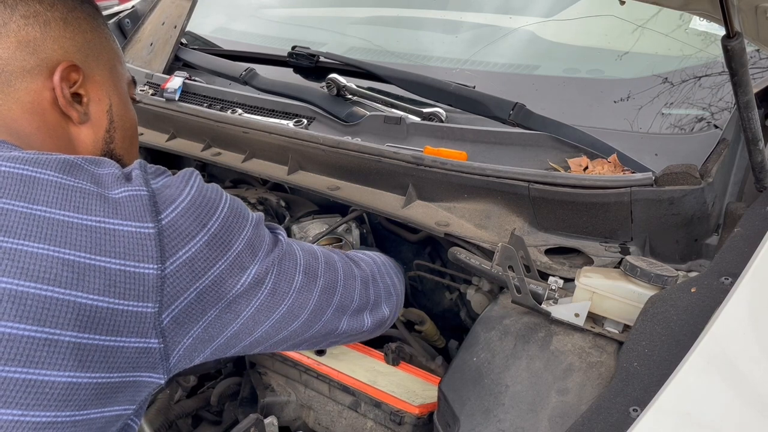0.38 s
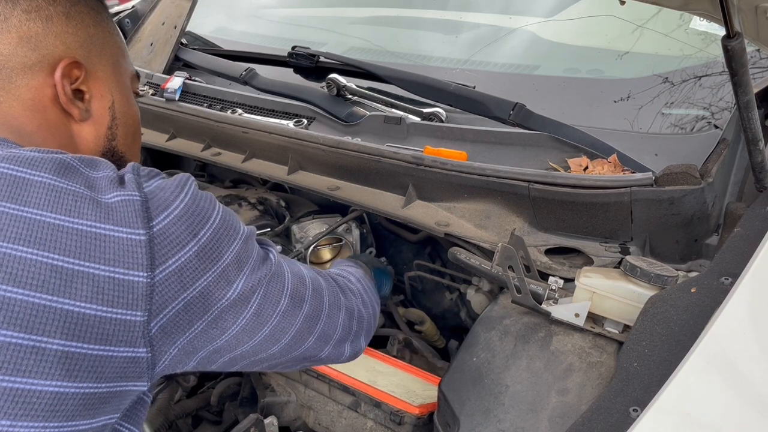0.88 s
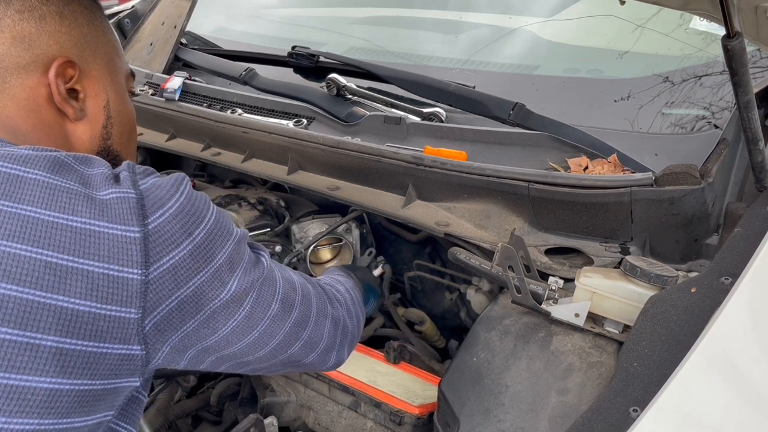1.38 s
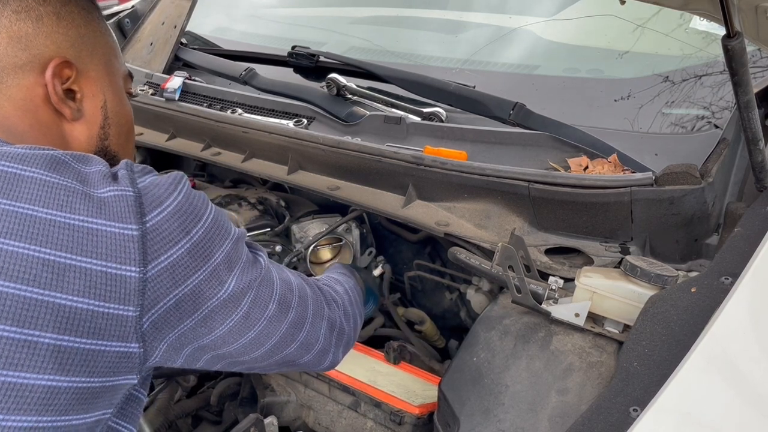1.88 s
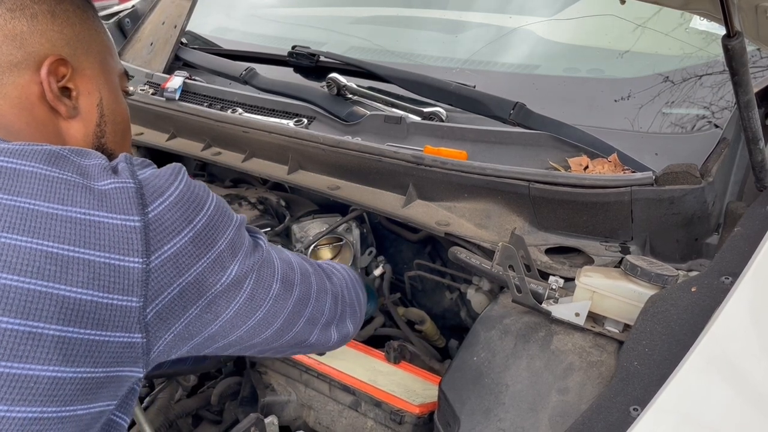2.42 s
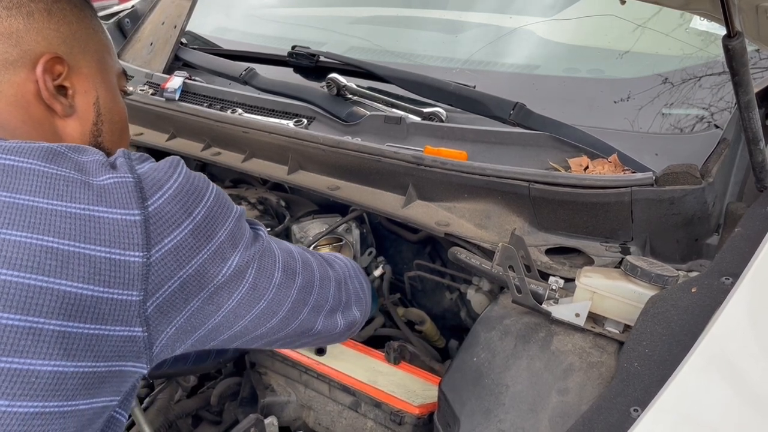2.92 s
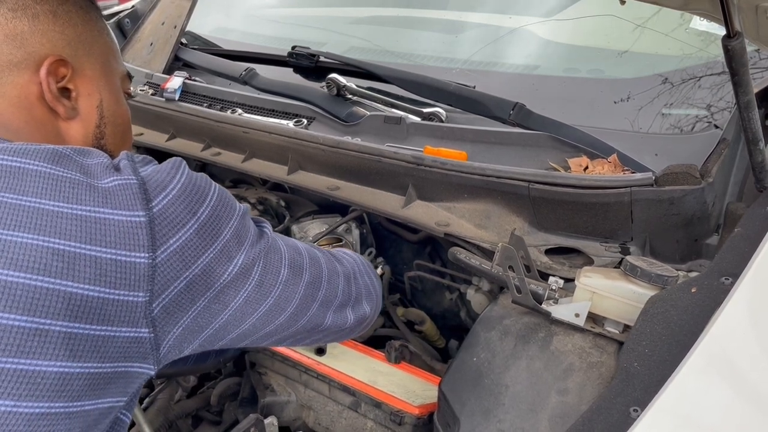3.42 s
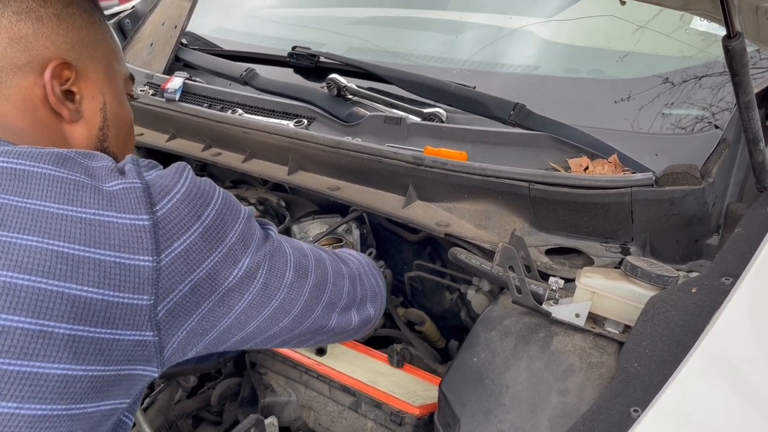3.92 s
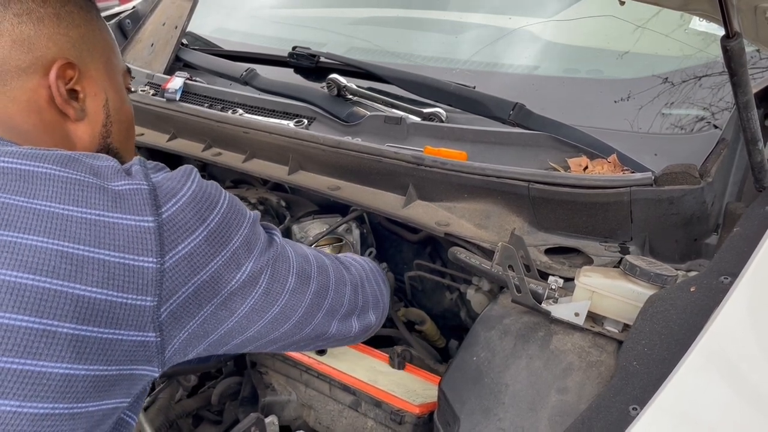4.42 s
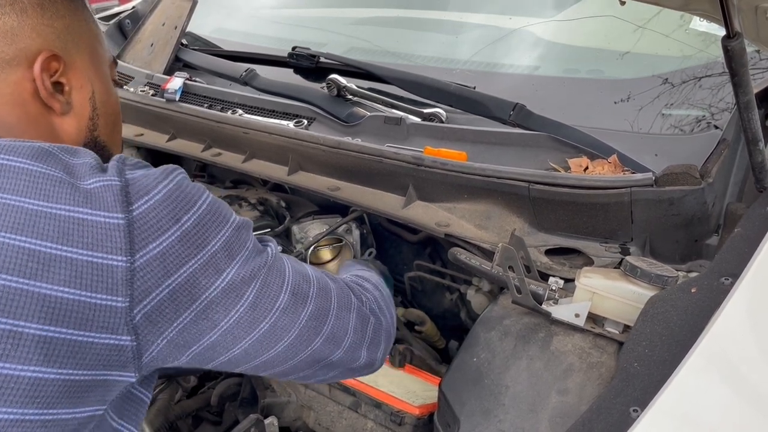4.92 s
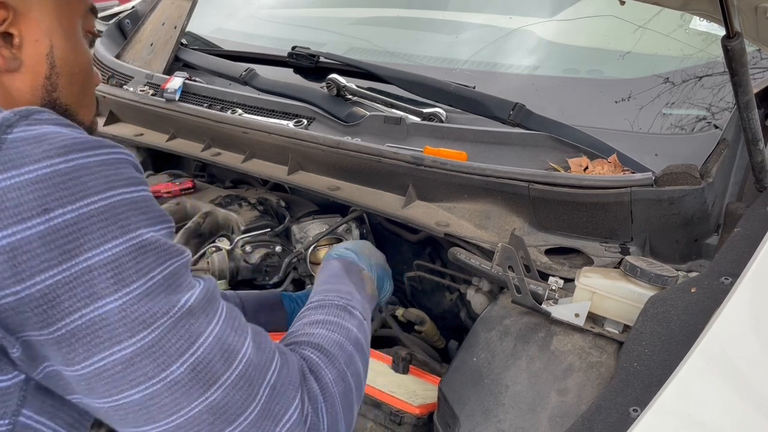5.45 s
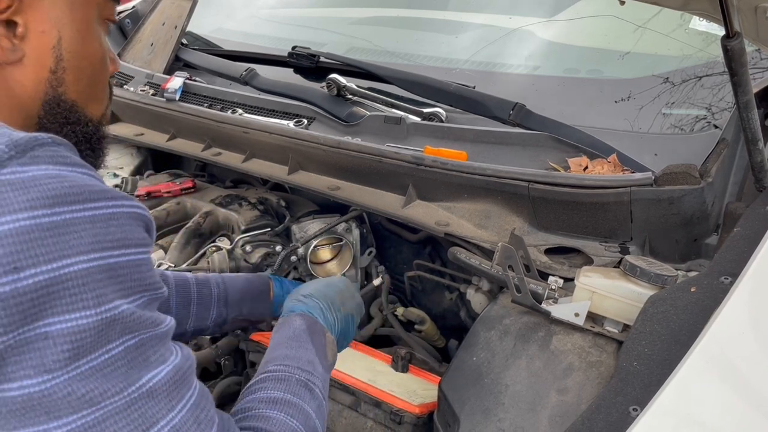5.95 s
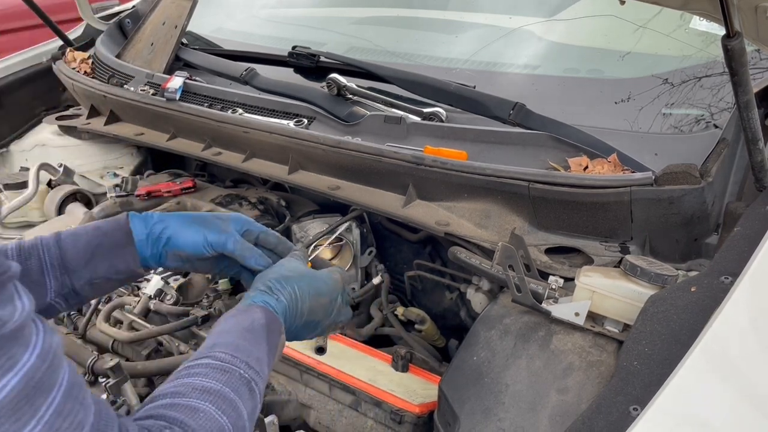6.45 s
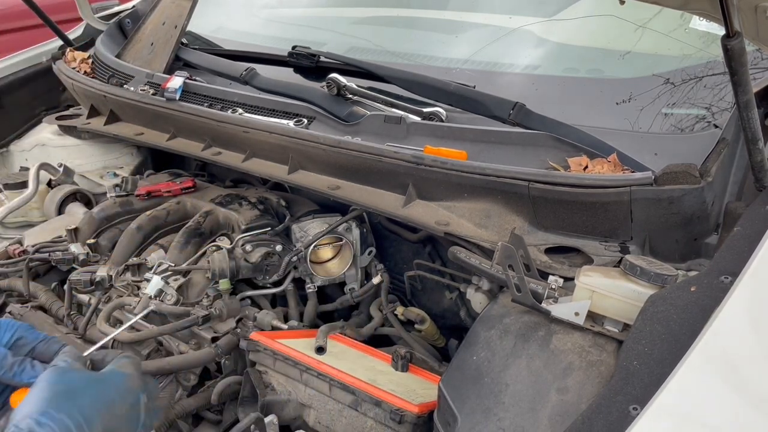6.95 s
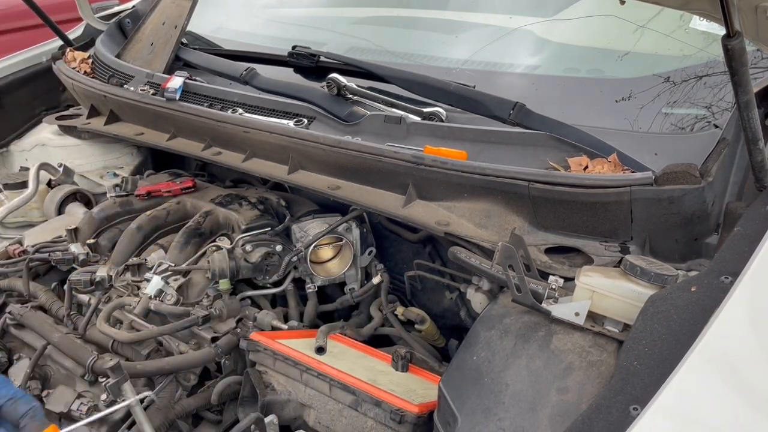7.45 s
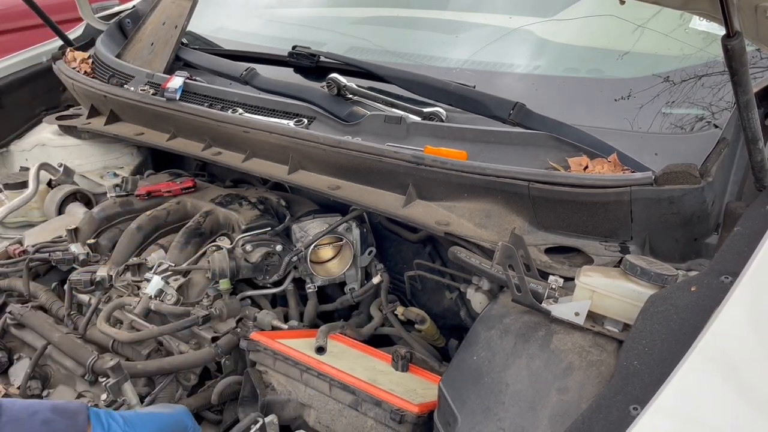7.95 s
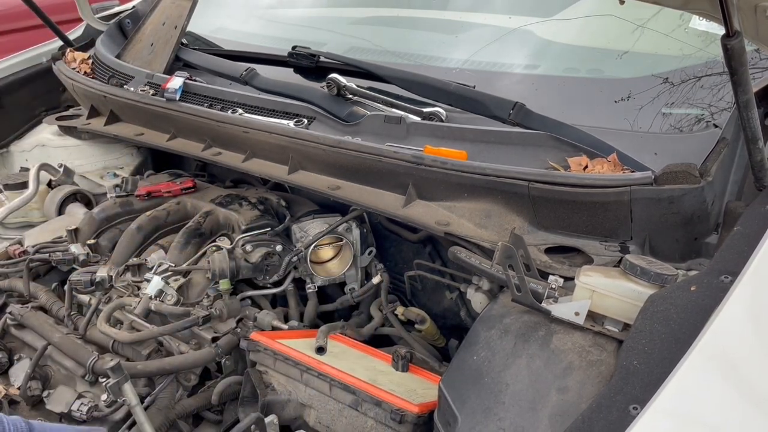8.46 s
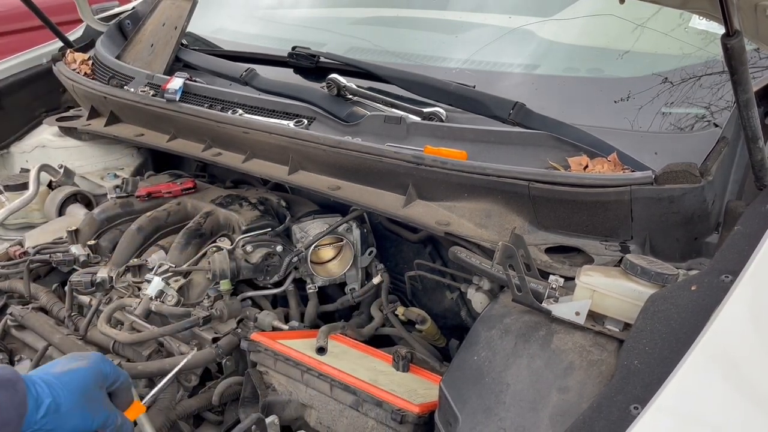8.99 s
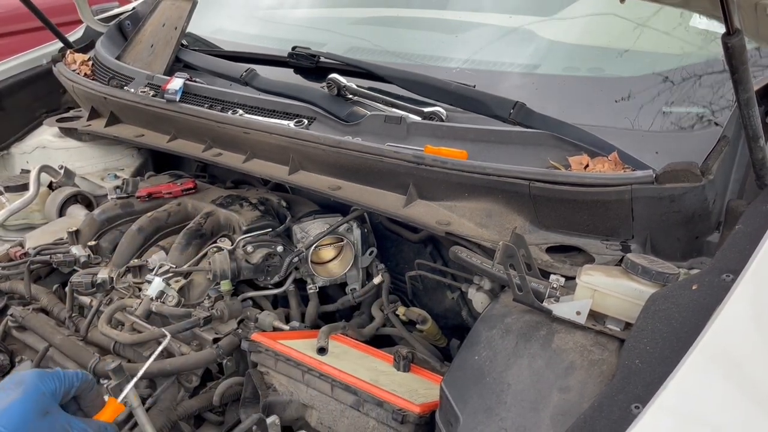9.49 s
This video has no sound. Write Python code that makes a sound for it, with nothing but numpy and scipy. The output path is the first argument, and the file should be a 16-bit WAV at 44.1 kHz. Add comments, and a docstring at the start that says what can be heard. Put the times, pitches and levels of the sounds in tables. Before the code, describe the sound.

Outdoors, breezy rumble over distant traffic; rapid steel clanking comes in spells, with sharp clicks, tool taps and cloth rustle close by.

```python
"""Gloved hands work at hoses and plastic connectors in an open engine bay, outdoors, close to a phone.
From the start: breeze and gusts as lumpy noise at two ports, far traffic roar and sleeve rustle as coloured noise,
and off to the right, in spells, a steel tool hammering about nine times a second: noise clanks and ringing tones.
Then bright metal ticks and single strong eddies; from 2.9 s clips snap and a tool taps, as cracks that ring the parts;
a tool tip drags over hose ribs at 6.2 s, and at 7.4 s two rough rising tones squeak faintly."""
import sys
import numpy as np
from scipy import signal
from scipy.fft import rfft, irfft, next_fast_len
from scipy.io import wavfile
from scipy.ndimage import uniform_filter1d, map_coordinates

SR = 44100
rng = np.random.default_rng(int(sys.argv[2]) if len(sys.argv) > 2 else 0)


def attenuation_scalar(level_db):
    """Turn a level in dB into a linear amplitude multiplier (20 dB per decade)."""
    decades = np.asarray(level_db, float) / 20
    return 10 ** decades


def digitize_waveform(pressure):
    """Quantize a signal to 16-bit integers and store it at the path in sys.argv[1].

    Rows of a 2-D input are taken as channels; values are limited to [-1, 1].
    """
    field = np.atleast_2d(pressure).T
    bounded = np.clip(field, -1, 1)
    quanta = np.round(bounded * 32767).astype(np.int16)
    wavfile.write(sys.argv[1], SR, quanta)


N = 423801

# Phase between the ports, near sound. Each row: frequency in Hz, lead of the left in radians.
NEAR_LEAD_RAD = [(0, 0), (3000, 1), (5500, 0.2), (6300, 3.33), (8000, 2.15), (8800, 1.54), (10000, 0.3),
                 (12000, -.4), (13500, -2.8), (16500, -3.1)]
# The same for far sound. Each row: frequency in Hz, lead of the left in radians.
FAR_LEAD_RAD = [(0, .01), (2240, 6.1), (5500, 6.2), (6500, 3.6), (8000, 3.1), (8800, 2.3), (9900, .15),
                (12200, -.1), (13300, -2.9), (16500, -3.1)]
# Likeness of far sound at the ports. Each row: frequency in Hz, correlation (0-1).
FAR_LIKENESS = [(200, 0.91), (500, 0.83), (1000, 0.52), (2500, 0.68), (4000, 0.029), (5000, 0.61),
                (6000, 0.11), (7300, 0.99), (8300, 0.9), (9200, 0.34), (10000, 0.74), (12000, 0.86),
                (13000, .5), (14000, 0.8)]


def unit(x):
    """Scaled to rms 1."""
    return x / np.sqrt(np.mean(x ** 2) + 1e-20)


def along(points, hz):
    """(Hz, value) points interpolated on a log frequency axis."""
    f, v = np.transpose(points)
    return np.interp(np.log(hz + 1), np.log(f + 1), v)


def curves(rows):
    """One value per sample for each column after the time."""
    s, *cols = np.transpose(rows)
    return [np.interp(np.arange(N) / SR, s, c) for c in cols]


def wobble(rate_hz):
    """A smooth random curve, rate_hz knots a second."""
    knots = rng.standard_normal(int(N * rate_hz / SR) + 4)
    return map_coordinates(knots, [np.arange(N) * rate_hz / SR])


def filtered(x, response):
    """x shaped by a complex response of frequency."""
    n = x.shape[-1]
    m = next_fast_len(n + 4096)
    return irfft(rfft(x, m) * response(np.fft.rfftfreq(m, 1 / SR)), m)[..., :n]


def ports(pair, lead):
    """Half of the phase lead goes to each port, with opposite signs."""
    hz, rad = np.transpose(lead)
    sign = np.array([[1], [-1]])
    return filtered(pair, lambda f: np.exp(.5j * np.interp(f, hz, rad) * sign))


def blended(pair, spectrum, likeness):
    """Two unrelated signals coloured and mixed to a left-right likeness, rms 1."""
    def mid_side_gain(hz):
        angle = np.arccos(np.clip(along(likeness, hz), -1, 1)) / 2
        return attenuation_scalar(along(spectrum, hz)) * [np.cos(angle), np.sin(angle)]

    mid, side = filtered(pair, mid_side_gain)
    return unit(np.array([mid + side, mid - side]))


def noise():
    """White noise for both ports."""
    return rng.standard_normal((2, N))


def coloured(spectrum, count):
    """Mono noise of a given colour, rms 1."""
    return unit(filtered(rng.standard_normal(count), lambda f: attenuation_scalar(along(spectrum, f))))


def ring(modes, t, scatter_db, shake_db):
    """Dying tones at new strengths; loose contact shakes the phase and size of each."""
    out = 0
    for hz, db, t60_s, rough_hz in modes:
        knots = rng.standard_normal((2, int(t[-1] * 2000) + 4))
        at = t * np.clip(rough_hz, 1, 2000)
        slip, shake = (np.interp(at, np.arange(len(k)), k) for k in knots)
        level_db = db + scatter_db * rng.normal() + shake_db * shake - 60 * t / t60_s
        out = out + attenuation_scalar(level_db) * np.sin(2 * np.pi * hz * t + 3.04 * slip)
    return out


def tail(t60_s, count):
    """A dying noise reverberation for each port, of energy 1 at the left."""
    answer = rng.standard_normal((2, count)) * attenuation_scalar(-60 * np.arange(count) / SR / t60_s)
    return answer / np.linalg.norm(answer[0])


def gusts():
    """Levels of the three eddy scales: the breeze and every gust add their powers."""
    # Breeze on the ports. Each row: time in seconds, rumble level in dB, rasp over rumble in dB.
    breeze_rows = [(0.0, -43, -27), (0.67, -41.5, -14.5), (1.5, -36.5, -18.5), (2.1, -41, -27),
                   (2.3, -54, -32), (2.45, -44.5, -34), (3.0, -43, -17), (3.5, -39, -16),
                   (4.15, -42.5, -16), (4.7, -31, -11), (5.45, -33.5, -20.5), (5.6, -47.5, -35),
                   (6.2, -46, -24), (7.05, -49, -18.5), (7.9, -45.5, -17), (8.2, -38.5, -19),
                   (8.5, -55, -13), (9.15, -49.5, -7.5), (9.61, -52, -10)]
    # Gusts over it. Each row: middle in seconds, length in seconds, rumble level in dB, rasp over rumble in dB.
    gust_rows = [(0.098, 0.068, -36, -17), (0.304, 0.071, -34, -37), (0.442, 0.095, -38, -10),
                 (0.923, 0.088, -37, -19), (1.12, 0.1, -34, -14), (1.385, 0.095, -26.5, -13),
                 (1.755, 0.039, -37.5, -11), (1.921, 0.09, -29.5, -10.5), (2.013, 0.054, -34, 0.5),
                 (2.22, 0.023, -39, -41), (2.601, 0.23, -31.5, -15.5), (2.85, 0.4, -34.5, -14.5),
                 (3.174, 0.045, -38.5, -9), (3.726, .12, -28, -1), (3.838, 0.033, -21.5, -14.5),
                 (3.925, 0.048, -30.5, -12.5), (4.02, 0.077, -22.5, -1.5), (4.201, 0.024, -31, -14),
                 (4.297, 0.054, -29.5, -22.5), (4.439, 0.078, -26.5, -2.5), (4.883, 0.14, -32.5, -8.5),
                 (5.062, 0.067, -28.5, -13.5), (5.199, 0.036, -26, -7.5), (5.352, 0.11, -32, -15.5),
                 (5.744, 0.2, -32, -10), (6.067, 0.033, -28.5, -43), (6.44, 0.025, -38, -35),
                 (6.74, 0.046, -35.5, -23), (6.864, 0.095, -35.5, -22), (6.968, 0.044, -36, -23),
                 (8.257, 0.073, -28.5, -13.5), (9.016, 0.092, -35, -20.5), (9.252, 0.041, -29.5, -24),
                 (9.382, 0.18, -37.5, -26.5), (9.5, 0.039, -45, -22)]
    end_fall_db, squareness = 4.5, 2.34  # loss at both ends of the length; 2 = bell, more = flat top
    flutter_db, flutter_share = 2, 0.37  # flutter over rumble = this + share of the rasp figure
    rasp_steeper = 2.22  # the small eddies live only in the heart of a gust

    def scale_powers(db, rasp_db):
        flutter = db + flutter_db + flutter_share * rasp_db
        return attenuation_scalar(np.array([db, flutter, db + rasp_db])) ** 2

    t = np.arange(0, N, 64) / SR
    s, *columns = np.transpose(breeze_rows)
    power = scale_powers(*(np.interp(t, s, c) for c in columns))
    for middle_s, length_s, db, rasp_db in gust_rows:
        fall_db = end_fall_db * np.abs(2 * (t - middle_s) / length_s) ** squareness
        power = power + scale_powers(db - fall_db, rasp_db - (rasp_steeper - 1) * fall_db)
    return [np.interp(np.arange(N) / SR, t, np.sqrt(p)) for p in power]


def wind():
    """Eddies arrive in lumps; the smaller they are, the spikier and the less alike at the two ports."""
    # Spectra of large, middle and small eddies. Each row: frequency in Hz, density in dB per Hz.
    rumble_colour = [(15, -60.5), (30, -18.5), (55, 0), (90, -2.5), (150, -9.5), (260, -31.5), (400, -95.5)]
    flutter_colour = [(60, -22), (120, -0.5), (200, 0.5), (300, -5.5), (450, -22.5), (700, -80)]
    rasp_colour = [(150, -36.5), (300, 2), (420, -1.5), (650, -8.5), (900, -14), (1300, -71.5)]
    shared_lump = wobble(32)

    def eddies(colour, depth_db, rate_hz, likeness):
        lumps = attenuation_scalar(depth_db * (shared_lump + wobble(rate_hz)))
        return unit(lumps * blended(noise(), colour, [(100, likeness)]))

    rumble, flutter, rasp = gusts()
    mix = rumble * eddies(rumble_colour, 2.07, 15, 0.87)
    mix = mix + flutter * eddies(flutter_colour, 2.5, 30, 0.78)
    mix = mix + rasp * eddies(rasp_colour, 4.25, 45, 0.67)
    # the eddies sweep over the left port first
    return ports(mix, FAR_LEAD_RAD)


def traffic():
    """A smooth far roar, a little stronger on the left."""
    # Spectrum. Each row: frequency in Hz, density in dB per Hz.
    roar_colour = [(120, -52), (200, -2), (373, -8.5), (558, -9), (899, -4.5), (1100, -6), (2210, -18.5),
                   (3490, -29), (5230, -39.5), (6520, -44.5), (7680, -49), (9400, -67.5), (12000, -62.5),
                   (16000, -75.5)]
    # Slow swell. Each row: time in seconds, level in dB before trim.
    swell = [(0.0, -56), (1.8, -57.5), (3.6, -57), (5.24, -58.5), (6.4, -57.5), (7.9, -55), (8.67, -56.5),
             (9.61, -56.5)]
    trim_db, pan_db = 8.5, np.array([[.6], [-.6]])
    level_db, = curves(swell)
    roar = ports(blended(noise(), roar_colour, FAR_LIKENESS), FAR_LEAD_RAD)
    return attenuation_scalar(level_db + trim_db + 0.37 * wobble(2.8) + pan_db) * roar


def rustle():
    """Cloth and gloves rub: fibres slip in fine uneven grains over a soft hiss."""
    # Rubbing. Each row: time in seconds, level in dB before trim.
    rub = [(0.0, -71), (1.18, -68), (1.74, -83), (2.46, -87.5), (2.85, -69.5), (3.53, -73), (3.85, -67.5),
           (4.47, -68), (5.3, -79), (5.7, -72), (6.13, -64.5), (6.32, -59.5), (6.42, -65), (6.8, -68.5),
           (7.36, -66.5), (7.92, -78), (8.22, -76), (8.27, -68.5), (8.53, -70.5), (8.6, -75.5), (9.31, -84),
           (9.48, -74), (9.61, -73)]
    # Spectrum. Each row: frequency in Hz, density in dB per Hz.
    cloth_colour = [(1500, -1.5), (3000, 4), (5000, -0.5), (7000, -2), (10000, -12), (13000, -18.5),
                    (15800, -14), (16300, -51.5)]
    trim_db = 5.0
    level_db, = curves(rub)
    grains = attenuation_scalar(16 * rng.random(N)) * (rng.random(N) < .02)
    grain_gain = 0.86 + 0.37 * unit(uniform_filter1d(grains, size=30))
    cloth = ports(blended(noise() * grain_gain, cloth_colour, FAR_LIKENESS), FAR_LEAD_RAD)
    return attenuation_scalar(level_db + trim_db + 2.47 * wobble(25) + 0.33 * wobble(7.4)) * cloth


def hammer():
    """Each far blow clanks on steel and smears in echoes off the yard."""
    # Blows. Each row: start in seconds, level in dB before trim, ring tilt about 4 kHz in dB per octave.
    blows = [(0.0034, -52.5, -7), (0.109, -47, -7), (0.222, -54.5, -13), (0.331, -48.5, -9),
             (0.452, -55, -9), (0.562, -51, -9), (0.662, -54, -4), (0.7636, -47, 1), (0.873, -52, 1),
             (0.9827, -56, -10), (1.0946, -48, -5), (1.2073, -48, 9), (3.8987, -57, -10), (4.0044, -55, 1),
             (4.1135, -51.5, 0), (4.2333, -68, 4), (6.1872, -44.5, -9), (6.4091, -41.5, -8),
             (6.5176, -41.5, -7), (6.6342, -42, -6), (6.746, -48, -4), (6.8563, -63, 8), (6.965, -50, 12),
             (7.0747, -43.5, 8), (7.1888, -42, -5), (7.301, -49, -8), (7.41, -51.5, -8), (7.519, -45.5, -7)]
    # Clank spectrum. Each row: frequency in Hz, density in dB per Hz.
    clank_colour = [(2500, -38), (4200, -2.5), (5200, -9), (6500, 8), (8000, -6), (12000, -21),
                    (16000, -45)]
    # Modes of the struck steel. Each row: frequency in Hz, relative level in dB, t60 in seconds, roughness in Hz.
    steel_modes = [(2830, -5, 0.33, 145), (3300, -11.5, 0.13, 270), (4470, -7, 0.33, 130),
                   (5030, -5, 0.18, 260), (5600, -9, 0.16, 310), (6220, -10.5, 0.23, 170),
                   (7040, -13, 0.12, 250)]
    usual_ring_db, ring_growth, usual_blow_db = -7, 0.65, -43.5  # the ring grows less than the clank
    shake_db, trim_db, yard_db = 3.2, -3.0, -1.5
    t = np.arange(SR // 2) / SR
    out = np.zeros((2, N + SR))
    for s, db, tilt_db in blows:
        ring_db = usual_ring_db + (ring_growth - 1) * (db - usual_blow_db)
        steel = [(hz, level_db + ring_db + tilt_db * np.log2(hz / 4000), *rest)
                 for hz, level_db, *rest in steel_modes]
        clank = attenuation_scalar(-60 * t / 0.035) * coloured(clank_colour, len(t))
        onset = 1 - np.exp(-t / 0.00083)
        blow = (ring(steel, t, 1.2, shake_db) + clank) * onset
        yard = signal.fftconvolve(blow[None], tail(0.38, count=8000), axes=1)[:, :len(t)]
        out[:, round(s * SR):][:, :len(t)] += attenuation_scalar(db + trim_db) * (blow + attenuation_scalar(yard_db) * yard)
    return ports(out[:, :N], FAR_LEAD_RAD) * attenuation_scalar([[-2.5], [2.5]])


def ticks():
    """Bright metal ticks: noise, a short ring, a faint longer noise tail and no low body."""
    # Ticks; the one at 1.208 s is the sharp edge of a hammer blow. Each row: start in seconds, level in dB,
    # noise frequency in Hz, left over right in dB, ring frequency in Hz, ring over noise in dB.
    tick_rows = [(.474, -59, 11000, 1, 11000, -12), (1.2084, -43.5, 5680, -15, 5000, -14),
                 (9.4422, -46.5, 6900, -6.5, 6190, 10)]
    t = np.arange(SR // 4) / SR
    out = np.zeros((2, N + SR))
    for s, db, hz, pan_db, ring_hz, ring_db in tick_rows:
        colour = [(0.52 * hz, -40), (0.88 * hz, 0), (1.1 * hz, 0), (1.15 * hz, -12), (1.95 * hz, -30)]
        decay = attenuation_scalar(-60 * t / .022) + attenuation_scalar(-19 - 60 * t / .3)
        tick = coloured(colour, len(t)) * decay
        tick = tick + ring([(ring_hz, ring_db, .05, 120)], t, 0, 1.5)
        gain = attenuation_scalar(db + pan_db * np.array([[.5], [-.5]]))
        out[:, round(s * SR):][:, :len(t)] += gain * tick
    return ports(out[:, :N], NEAR_LEAD_RAD)


def pops():
    """A single strong eddy flicks the diaphragms for a cycle or two, falling in pitch as it passes."""
    # Eddies. Each row: time one cycle ahead of the middle in seconds, level in dB before trim, frequency in Hz.
    pop_rows = [(1.074, -29.5, 350), (1.13, -27, 327), (1.36, -26, 318), (1.891, -26.5, 327),
                (1.932, -25, 367), (1.997, -25, 414), (2.59, -26.5, 392), (2.67, -30.5, 400),
                (2.712, -27.5, 350), (3.155, -32, 400), (3.661, -25.5, 435), (3.692, -26, 427),
                (3.724, -22, 400), (3.755, -20, 417), (3.84, -21.5, 383), (3.992, -13.5, 393),
                (4.023, -29, 400), (4.041, -16, 345), (4.411, -25.5, 360), (4.44, -22, 384),
                (4.786, -25, 337), (4.855, -25, 350), (4.886, -18.5, 317), (4.957, -23.5, 303),
                (5.227, -27.5, 400), (5.343, -27.5, 420), (9.307, -30.5, 320)]
    pitch_fall, trim_db = 0.27, 1  # share of the mid pitch lost each cycle
    t = np.arange(-SR // 20, SR // 20) / SR
    out = np.zeros((2, N + SR))
    for s, db, hz in pop_rows:
        size_db, phase = rng.normal(size=(2, 2, 1))  # differ between the ports
        bell = np.exp(-(t * hz / 1.24) ** 2)
        angle = 2 * np.pi * hz * t * (1 - pitch_fall * hz * t / 2)
        flick = bell * np.cos(angle + 0.25 * phase + 6 * rng.random())
        start = round((s + 1 / hz) * SR) - len(t) // 2
        out[:, start:][:, :len(t)] += attenuation_scalar(db + trim_db + 1.2 * size_db) * flick
    return ports(out[:, :N], FAR_LEAD_RAD)


def contacts():
    """Each snap or tap is a crack of a few milliseconds that rings the housings and the part that is struck."""
    # Snaps and knocks. Each row: start in seconds, level in dB before trim, then over the crack in dB: housings,
    # treble (before its own trim), part ring; last, name of the part that rings.
    knocks = [(2.8574, -25.5, -12, -16, -7, "clip"), (3.483, -23.5, -7.5, -14, -4.5, "clamp"),
              (3.492, -44, -14, -16, 18, "cover"), (4.5175, -36, -19, -3, -21, "latch"),
              (4.5208, -19.5, -13, -5, -6, "latch"), (4.5235, -31.5, -4.5, -24, 13.5, "box"),
              (4.5315, -34, -3, -24, 16.5, "box"), (4.6356, -30, -7.5, -13, -8, "latch"),
              (6.121, -35, -13, -14, 3, "hose"), (6.1278, -25.5, -5, -13, -10, "pipe"),
              (6.1596, -37.5, -3, -18, -8, "pipe"), (6.464, -38.5, -21, -14, -2, "hose"),
              (7.9648, -22.5, -10, -5, 0, "tool"), (7.9855, -37, -9, -22, 8, "tool"),
              (7.994, -35.5, -1, -21, -4, "tool"), (8.0236, -44.5, -15, -21, 9.5, "tool"),
              (8.0501, -30, -18, -11.5, -5, "shaft"), (8.0885, -38, -12.5, -13, -12, "shaft"),
              (8.2408, -31.5, -1, -10, 3.5, "bracket"), (8.2505, -39, -3, -9.5, 5, "bracket")]
    # Faint taps of a fingertip or tool tip. Each row: start in seconds, level in dB before trim.
    tap_rows = [(3.6768, -45.5), (3.729, -45.5), (4.3162, -49), (4.413, -46), (5.0418, -45.5), (5.189, -45),
                (5.879, -42), (8.2768, -45), (8.31, -50), (8.384, -45.5), (8.536, -49)]
    # Modes of the plastic housings. Each row: frequency in Hz, relative level in dB, t60 in seconds, roughness in Hz.
    housing_modes = [(453, -2, 0.045, 110), (727, -1, 0.05, 60), (885, -5, 0.04, 47),
                     (1240, -19, 0.03, 140), (1653, -13, 0.04, 150), (1904, -12, 0.04, 340)]
    # Modes by part name. Each row: frequency in Hz, relative level in dB, t60 in seconds, roughness in Hz.
    part_modes = {"clip": [(1594, 5, .045, 60), (3000, 0, 0.033, 100), (3760, 4, .03, 180),
                  (5000, -3, .03, 98)], "clamp": [(785, 6, 0.055, 60), (1670, 2, .05, 75),
                  (2045, -1.5, 0.044, 60), (2560, 2, .035, 90), (4900, 1, 0.027, 120)],
                  "cover": [(897, 2, .1, 20)], "box": [(400, -1, .03, 20), (557, -7, .03, 20),
                  (723, 1, 0.05, 15), (893, -8, 0.027, 30), (1640, -12, 0.04, 70)],
                  "bracket": [(1097, -4, 0.057, 65), (1837, -2, .05, 54), (4560, -12, 0.036, 100),
                  (5170, 0.5, 0.037, 180), (6420, -9, .04, 150)], "latch": [(1660, -2, .05, 48),
                  (2146, -2, 0.059, 140), (2970, -6, 0.042, 45), (4260, -3.5, 0.022, 200),
                  (4940, -2, 0.028, 150), (5480, -1, 0.022, 120), (10800, -9.5, 0.027, 340),
                  (15700, -14, 0.022, 300)], "hose": [(4320, -1, 0.029, 140)],
                  "pipe": [(3510, -1, 0.076, 180), (1220, 4.5, 0.042, 310), (2470, 3, 0.038, 250),
                  (4900, 3, .03, 180), (5300, -2, 0.032, 150)], "tool": [(1397, -4, 0.07, 250),
                  (2442, 1, 0.061, 60), (4330, -12, 0.033, 230), (4840, -13, .03, 200),
                  (5800, -10, .03, 130)], "shaft": [(2460, -3, 0.084, 70), (4270, -2, 0.044, 150),
                  (4960, -9, .03, 150), (5570, -9.5, 0.027, 150)], "tip": [(5250, 0.5, 0.039, 350)]}
    # Crack spectra, main and treble. Each row: frequency in Hz, density in dB per Hz.
    crack_colour = [(600, -1), (1500, 7), (2500, 2), (3500, 0.5), (5000, -0.5), (6500, 2.5), (7600, -19.5),
                    (12000, -34)]
    treble_colour = [(4000, -37), (6500, 2), (7800, -5.5), (9500, -3.5), (11000, -8), (13500, -8),
                     (15600, -3.5), (16300, -7.5), (16600, -30)]
    small_housing_db = -6  # housings over the crack for taps and ribs
    tap_treble_db, tap_ring_db = -10.5, -15.5
    ribs_start_s, rib_gap_s, rib_db, rib_treble_db, rib_ring_db = 6.2477, 0.0302, -39, -14, -1.5
    trim_db, treble_trim_db, bay_db = -5.0, 8.0, -9.5

    taps = [(s, db, small_housing_db, tap_treble_db, tap_ring_db, "tip") for s, db in tap_rows]
    # the tool tip drags over a ribbed hose
    ribs = [(ribs_start_s + k * rib_gap_s, rib_db, small_housing_db, rib_treble_db, rib_ring_db, "hose")
            for k in range(5)]
    t = np.arange(SR // 5) / SR
    onset = 1 - np.exp(-t / 0.0011)
    out = np.zeros((2, N + SR))
    for s, db, housing_db, treble_db, ring_db, part in knocks + taps + ribs:
        crack = attenuation_scalar(-60 * t / 0.034) * coloured(crack_colour, len(t))
        treble = attenuation_scalar(-60 * t / 0.022) * coloured(treble_colour, len(t))
        crack = crack + attenuation_scalar(treble_db + treble_trim_db) * treble
        tones = attenuation_scalar(housing_db) * ring(housing_modes, t, 1.8, 0.62)
        tones = tones + attenuation_scalar(ring_db) * ring(part_modes[part], t, 1.3, 2.1)
        hit = (crack + tones) * onset
        # the cowl and hood throw back a short, different answer to each port
        bay = signal.fftconvolve(hit[None], tail(0.058, count=4000), axes=1)[:, :len(t)]
        out[:, round(s * SR):][:, :len(t)] += attenuation_scalar(db + trim_db) * (hit + attenuation_scalar(bay_db) * bay)
    return ports(out[:, :N], NEAR_LEAD_RAD) * attenuation_scalar([[1], [-1]])


def squeak():
    """Two rough tones rise together, as from a stretched rubber hose."""
    # Upper tone. Each row: time in seconds, frequency in Hz, level in dB.
    glide = [(7.43, 3800, -110), (7.47, 3930, -75), (7.53, 4130, -68), (7.57, 4250, -65), (7.63, 4310, -66),
             (7.68, 4350, -110)]
    hz, level_db = curves(glide)
    turns = np.cumsum(hz) / SR
    upper = np.sin(2 * np.pi * turns + .7 * wobble(120))
    lower = 1.1 * np.sin(2 * np.pi * .795 * turns + .7 * wobble(110))
    pan_db = np.array([[-2.5], [2.5]])
    return attenuation_scalar(level_db + 3 * wobble(35) + pan_db) * (upper + lower)


def scene():
    """Everything at the two ports."""
    return wind() + traffic() + rustle() + hammer() + ticks() + pops() + contacts() + squeak()


def band_limit(x):
    """A steep low-pass at the top of the band."""
    return signal.sosfilt(signal.butter(12, 16670, fs=SR, output="sos"), x)


def record(dry):
    """The finished mix as the phone keeps it."""
    return band_limit(dry)


dry = scene()
out = record(dry)
digitize_waveform(out)
```